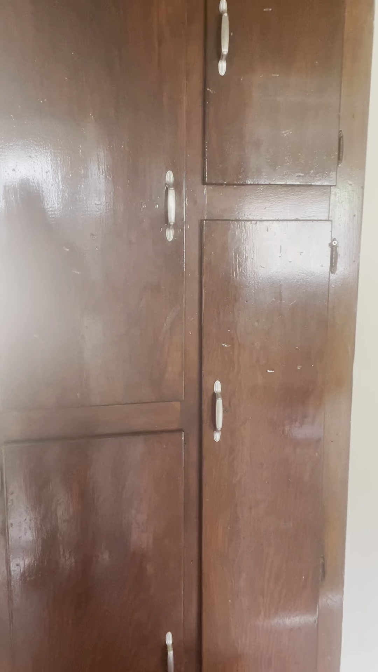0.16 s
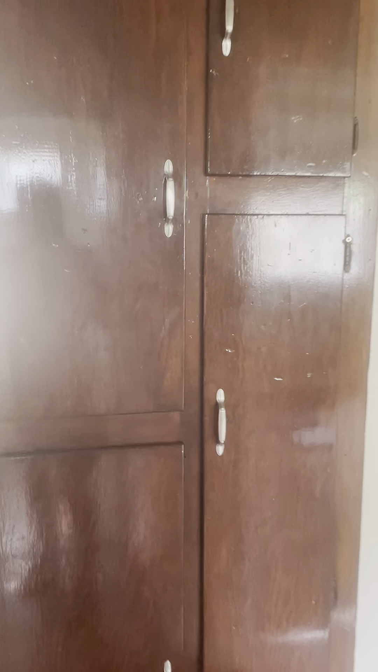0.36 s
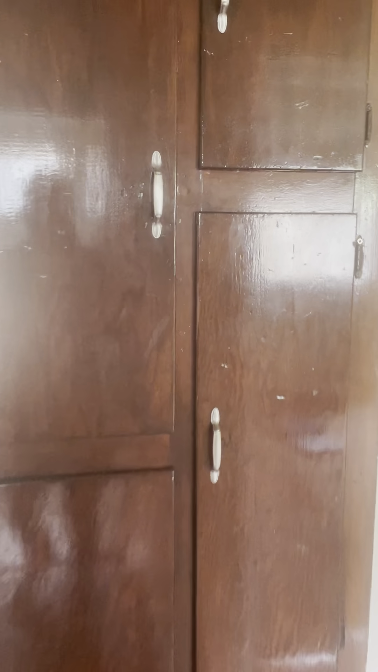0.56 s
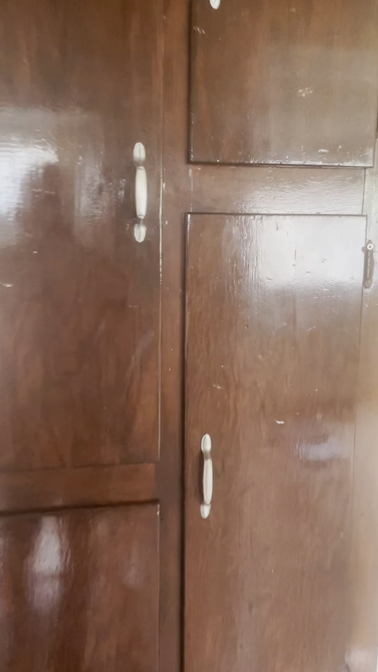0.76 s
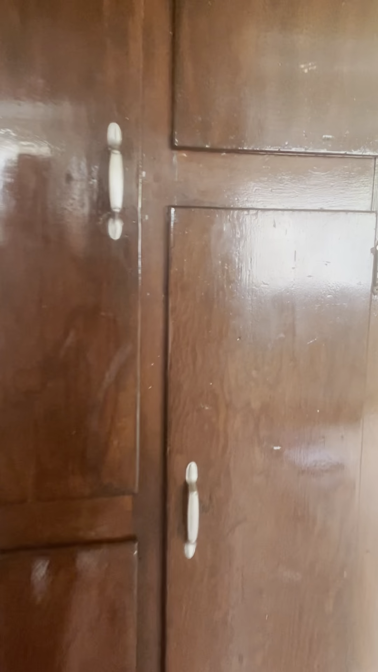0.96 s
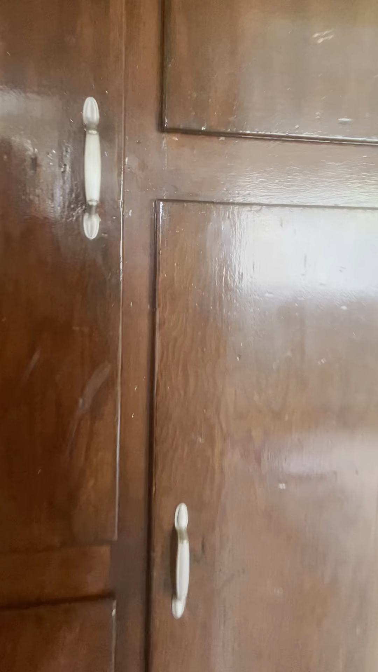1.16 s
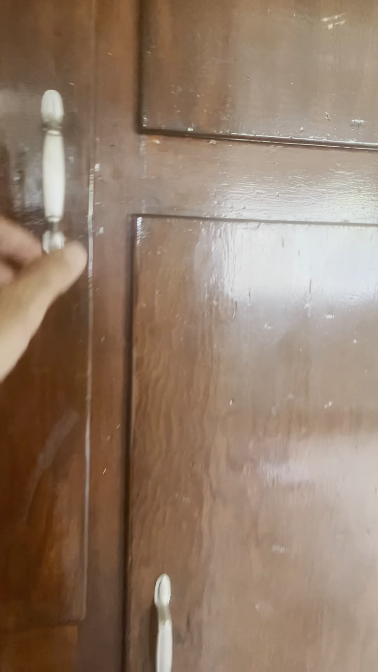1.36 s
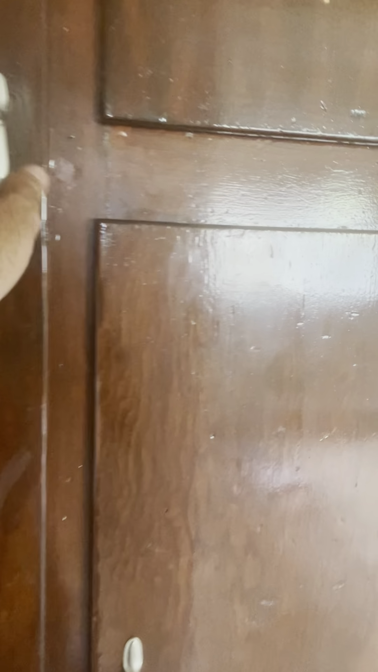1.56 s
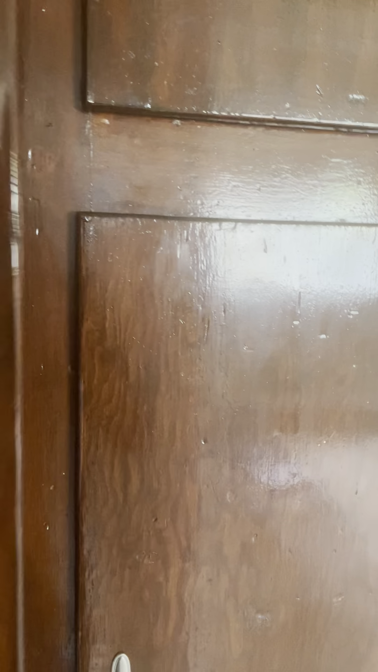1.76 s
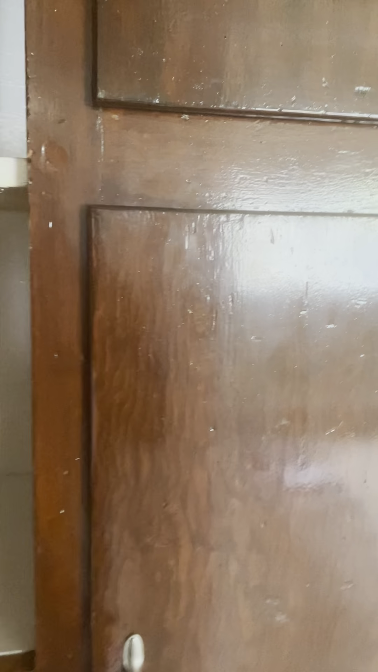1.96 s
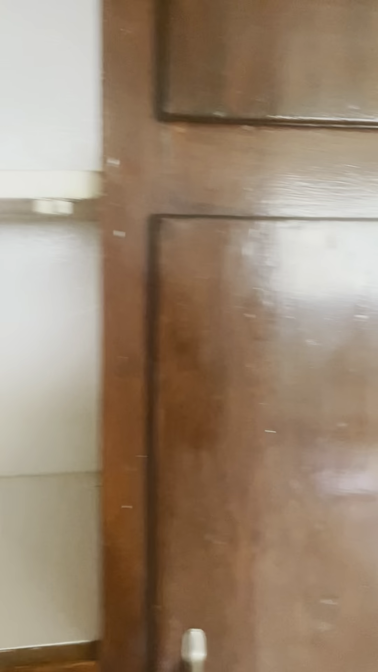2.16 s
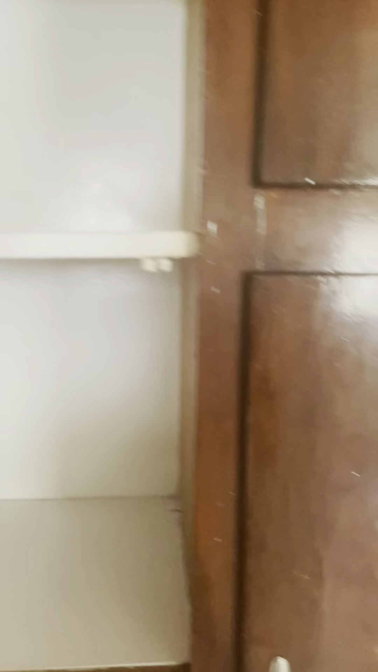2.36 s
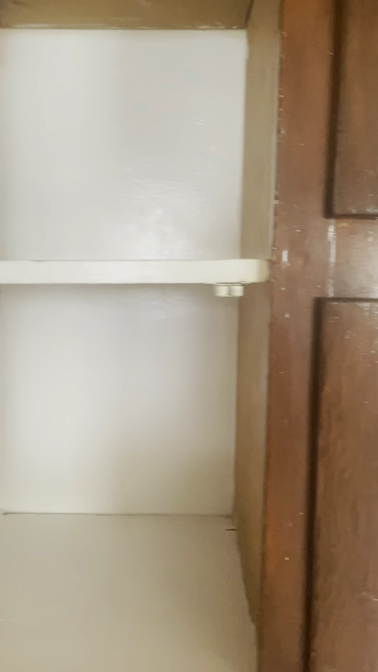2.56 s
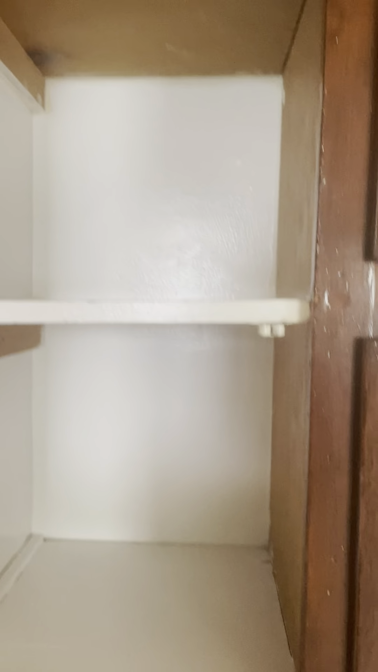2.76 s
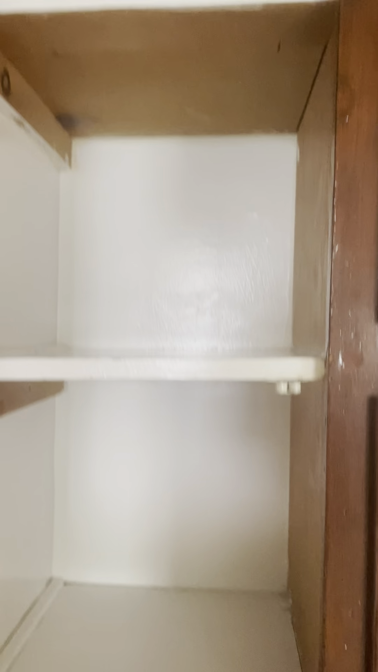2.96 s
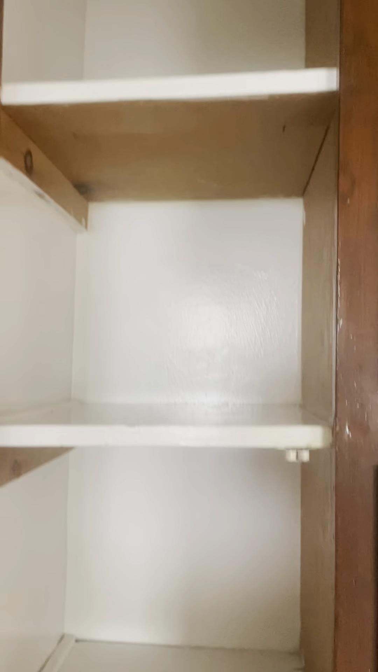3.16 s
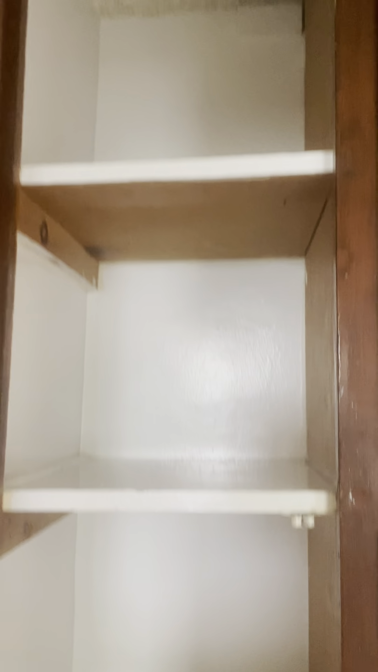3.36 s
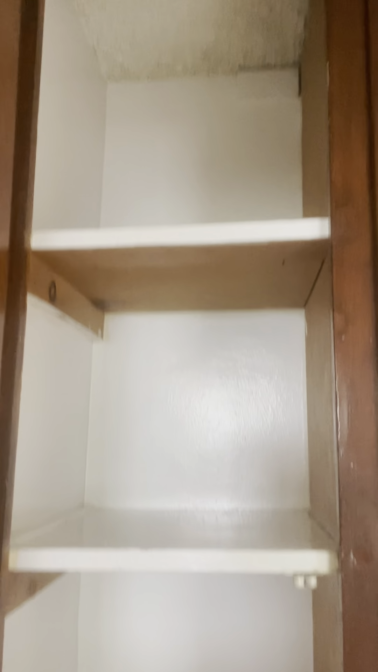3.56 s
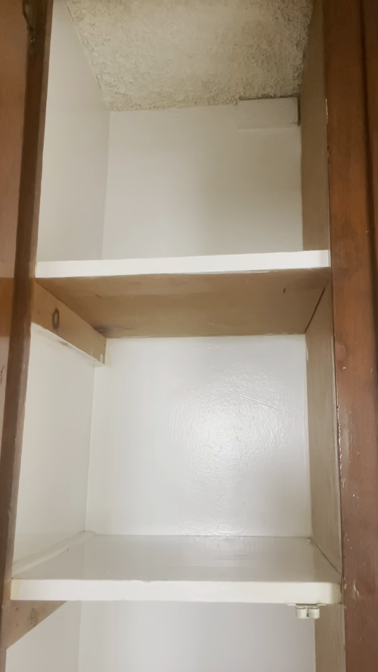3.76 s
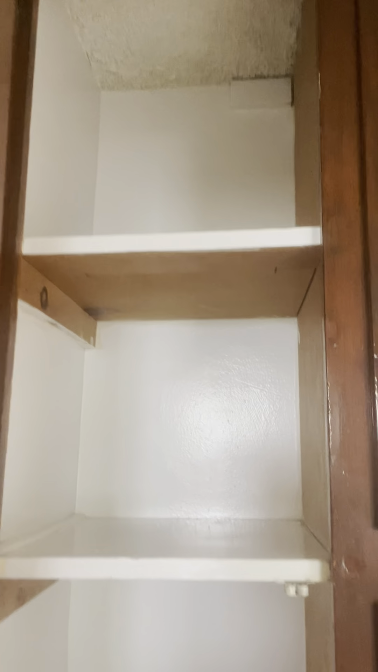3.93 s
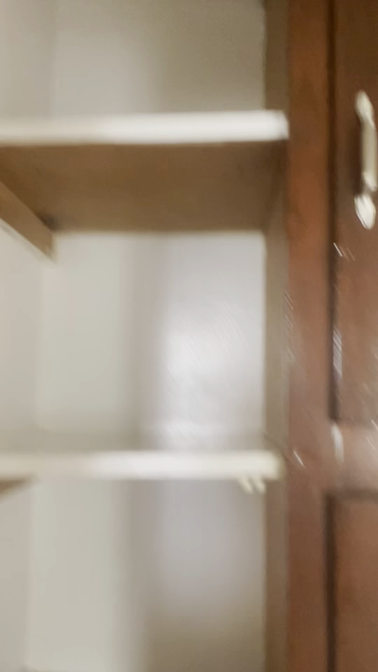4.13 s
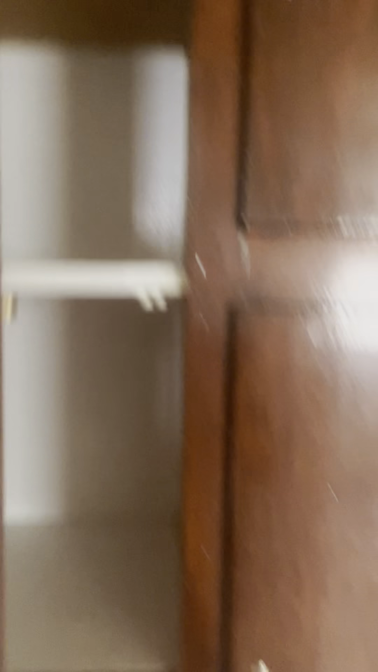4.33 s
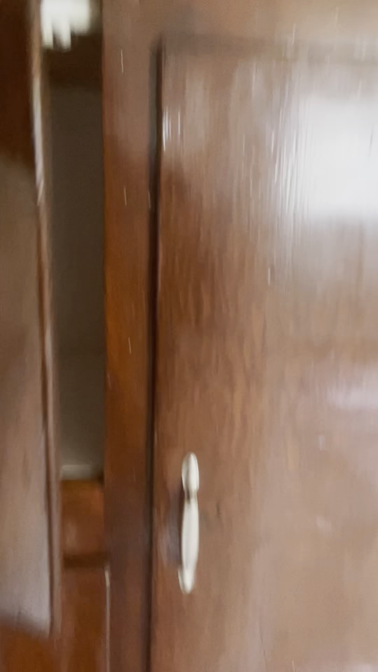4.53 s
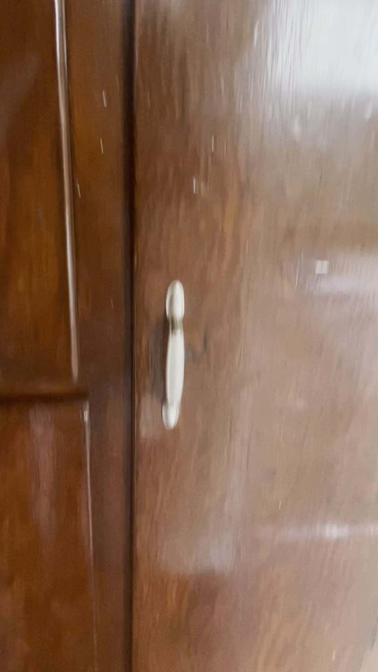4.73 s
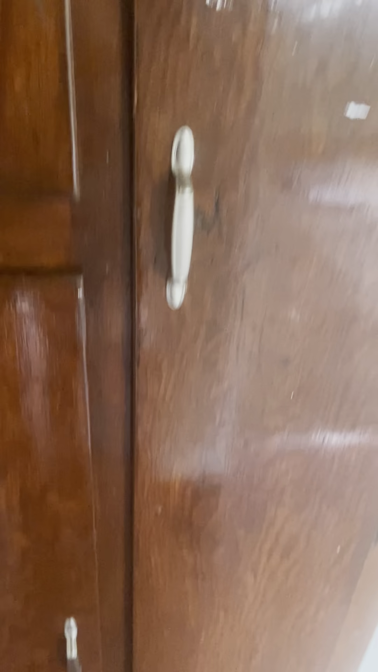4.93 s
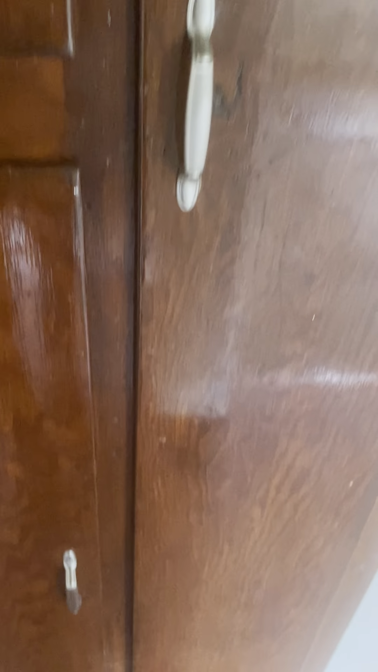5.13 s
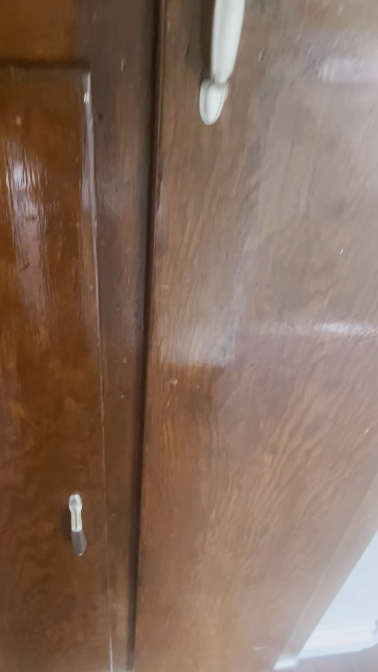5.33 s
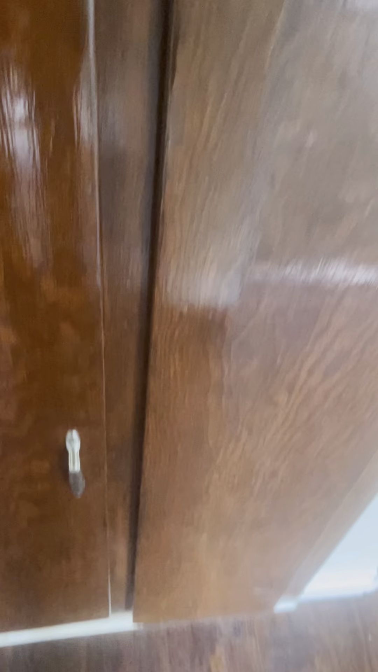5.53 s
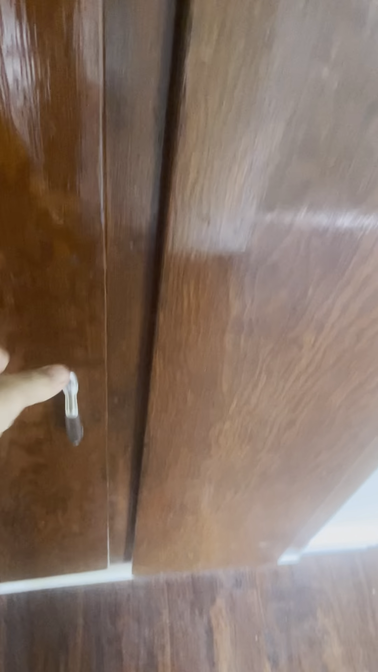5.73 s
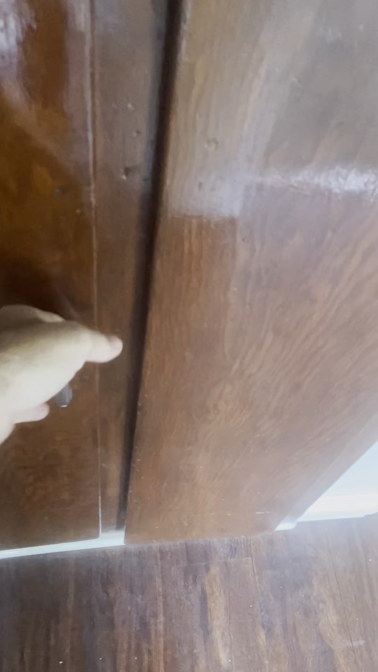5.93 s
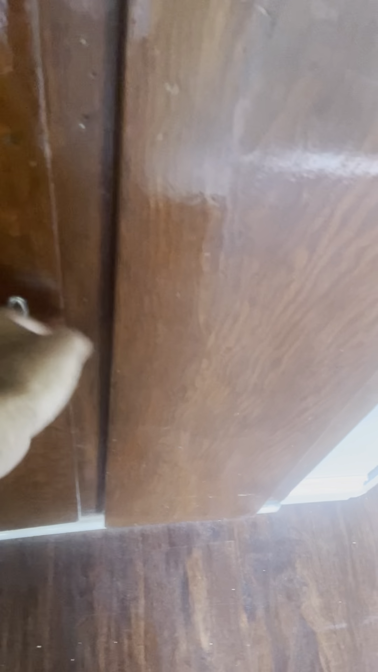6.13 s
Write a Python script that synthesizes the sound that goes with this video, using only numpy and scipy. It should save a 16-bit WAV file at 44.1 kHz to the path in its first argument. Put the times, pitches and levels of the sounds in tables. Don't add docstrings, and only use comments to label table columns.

```python
import sys
import numpy as np
from scipy import signal
from scipy.fft import rfft, irfft, next_fast_len
from scipy.io import wavfile
from scipy.ndimage import uniform_filter1d, map_coordinates

SR = 44100
rng = np.random.default_rng(int(sys.argv[2]) if len(sys.argv) > 2 else 0)


def put_to_file(sound):
    columns = np.atleast_2d(sound).T
    safe = np.clip(columns, -1, 1)
    whole_steps = np.round(safe * 32767)
    wavfile.write(sys.argv[1], SR, whole_steps.astype(np.int16))


def nominal_scale(level):
    x = np.asarray(level, float) / 20
    return 10 ** x


N = 277433


def unit(x):
    return x / np.sqrt(np.mean(x ** 2) + 1e-20)


def along(points, hz):
    f, value = np.transpose(points)
    return np.interp(np.log(hz + 1), np.log(f + 1), value)


def level_curve(rows):
    s, db = np.transpose(rows)
    return np.interp(np.arange(N) / SR, s, db, -120, -120)


def wobble(rate):
    knots = rng.standard_normal(int(N * rate / SR) + 4)
    return map_coordinates(knots, [np.arange(N) * rate / SR])


def filtered(x, response):
    n = x.shape[-1]
    m = next_fast_len(n + 4096)
    return irfft(rfft(x, m) * response(np.fft.rfftfreq(m, 1 / SR)), m)[..., :n]


def rush(spectrum, patchy_db):
    z = signal.stft(rng.standard_normal((2, N + 512)), nperseg=512)[2]
    field = uniform_filter1d(rng.standard_normal(z.shape[1:]), size=5, axis=0)
    field = uniform_filter1d(field, size=12, axis=1)
    pair = signal.istft(z * nominal_scale(patchy_db * unit(field)), nperseg=512)[1][:, :N]
    return unit(filtered(pair, lambda hz: nominal_scale(along(spectrum, hz))))


def held(rows, attack, release):
    t = np.arange(0, N / SR + .002, .002)
    s, length, db = np.transpose(rows)[..., None]
    rising = 20 * np.maximum((s - t) / attack, 0)
    falling = 20 * np.maximum((t - s - length) / release, 0)
    gain = np.sqrt(np.sum(nominal_scale(db - rising - falling) ** 2, axis=0))
    return np.interp(np.arange(N) / SR, t, gain)


def hum(rows, hz, width_hz):
    band = filtered(rng.standard_normal((2, N)), lambda f: 1 / (1 + ((f - hz) / width_hz) ** 2))
    return held(rows, attack=0.039, release=0.1) * unit(band)


def ring(t, hz, t60, attack):
    return np.sin(2 * np.pi * hz * t) * nominal_scale(-60 * t / t60) * (1 - np.exp(-t / attack))


def modes(t, table, damping, factor=1, attack=0.005):
    total = 0
    for hz, db, t60 in table:
        luck, sign = rng.standard_normal(2)
        total = total + np.sign(sign) * nominal_scale(db + 2 * luck) * ring(t, factor * hz, damping * t60, attack)
    return total


# pitch in Hz, level in dB per Hz.
SNAP_COLOUR = [(300, -17), (800, 2.5), (2500, 0.5), (5000, -8.5), (7500, -14), (11000, -28), (12700, -35.5),
               (14500, -25), (15600, -25.5), (16200, -51)]


def snap(t, bright_db, t60, rise=0.00016):
    crackle = rng.standard_normal(len(t)) * nominal_scale(3.7 * rng.standard_normal(len(t)))
    burst = crackle * nominal_scale(-60 * t / t60) * (1 - np.exp(-t / rise))
    x = filtered(burst, lambda f: nominal_scale(along(SNAP_COLOUR, f) + bright_db * np.log2((f + 50) / 3000)))
    return x / np.abs(x).max()


# pitch in Hz, level in dB, time to fall 60 dB in seconds.
PANEL = [(74.4, -14, 0.32), (115, -8.5, 0.21), (155.1, -3.5, 0.17), (206.9, -5.5, 0.11)]


def wood_body(t, thud_db, knock_db, knock_hz, thud_damping, knock_s):
    cluster = [(.7 * knock_hz, -8, .1), (knock_hz, 0, .1), (1.17 * knock_hz, -7, .08), (1.45 * knock_hz, -12, .05)]
    knock = modes(t, cluster, 0.74, attack=0.0011)
    knock = knock * np.exp(-(t / knock_s) ** 4)
    return nominal_scale(thud_db - 5.5) * modes(t, PANEL, thud_damping) + nominal_scale(knock_db - 5) * knock


# pitch in Hz, time to fall 60 dB in seconds.
ROOM = [(60, 0.86), (250, 0.7), (1000, 0.68), (4000, 0.83), (8000, 0.58), (12000, 0.288)]
# pitch in Hz, level in dB.
ECHO = [(100, 6.5), (500, 4), (2000, -3), (6000, -5), (10000, -8), (16000, -9.5)]


def echoes(count):
    hz, t, z = signal.stft(rng.standard_normal((count, 2, SR)), SR, nperseg=256)
    t60 = along(ROOM, hz)[:, None]
    early = .9 * nominal_scale(-60 * t / .15)
    fade = (nominal_scale(-60 * t / t60) + early) * nominal_scale(along(ECHO, hz))[:, None] / np.sqrt(t60 * 3500)
    tails = signal.istft(z * fade, SR, nperseg=256)[1]
    build_up = np.arange(tails.shape[2]) / SR / 0.0063 - .2
    return tails * np.clip(build_up, 0, 1)


def add(air, room, s, sound, dry_db, wet_db):
    tail = room[rng.integers(len(room))]
    heard = nominal_scale(wet_db) * signal.fftconvolve(sound[None], tail, axes=1)
    heard[0, :len(sound)] += nominal_scale(dry_db) * sound
    spot = air[:, round(s * SR):][:, :heard.shape[1]]
    spot += heard[:, :spot.shape[1]]


# pitch in Hz, level in dB per Hz.
HISS = [(550, 3.5), (950, 17), (2000, -2), (5500, -1.5), (7500, -10), (11000, -13.5), (16000, -22)]


def steady_hiss():
    return nominal_scale(-77.0 + 1.6 * wobble(5)) * rush(HISS, patchy_db=-3)


# time in seconds, level in dB.
BUSY = [(0, -59), (.25, -65.5), (.4, -54), (.9, -64.5), (1.07, -55), (1.18, -60), (1.45, -53.5),
        (1.95, -67), (2.03, -50), (2.16, -58.5), (3, -61.5), (3.55, -71), (4.0, -72), (4.3, -65),
        (4.92, -68.5), (5.3, -49), (6.0, -57.5), (6.3, -80)]
CALM_DB = -62.5


def busyness():
    return level_curve(BUSY) - CALM_DB


# pitch in Hz, level in dB per Hz.
RUMBLE = [(12, -59.5), (22, -14.5), (45, -4.5), (59, -1), (77, 0.5), (92, -17), (124, -6.5), (188, -28),
          (250, -24.5), (320, -62), (550, -120)]
# start in seconds, length in seconds, level in dB.
SWAYS = [(.1, 0.18, -43.5), (.38, 0.2, -47.5), (.6, 0.19, -47.5), (.97, 0.02, -46.5), (1.15, 0.091, -49),
         (1.52, 0.086, -41.5), (1.8, 0.15, -47), (2.1, 0.25, -43), (2.55, .16, -59), (2.85, 0.087, -50.5),
         (3.47, 0.015, -50.5), (4.3, 0.14, -60.5), (4.6, 0.076, -64), (4.75, 0.23, -57.5),
         (5.0, 0.35, -44.5), (5.56, 0.044, -51), (6.01, 0.11, -42)]


def house_rumble(busy_db):
    sway = held(SWAYS, attack=0.089, release=0.087)
    gain = np.hypot(sway, nominal_scale(-53.5 + 0.19 * busy_db))
    return gain * nominal_scale(0.6 * wobble(7.0)) * rush(RUMBLE, patchy_db=-0.3)


# pitch in Hz, level in dB per Hz.
MURMUR = [(120, -9.5), (200, 1), (376, -5), (597, -8), (680, -9.5), (752, -8), (1430, -16.5), (1580, -16.5),
          (2200, -39.5), (2860, -74.5), (4840, -120)]


def room_murmur(busy_db):
    return nominal_scale(CALM_DB + busy_db + 0.27 * wobble(10.0)) * rush(MURMUR, patchy_db=2.5)


# start in seconds, length in seconds, level in dB.
BRUSHES = [(.06, 0.087, -80), (.5, 0.29, -79.5), (.97, 0.14, -76), (1.18, .34, -80.5), (2.02, .02, -74.5),
           (3.55, 0.19, -91.5), (4.42, 0.03, -82), (4.62, 0.013, -86), (5.0, .02, -89), (5.53, .03, -80.5),
           (5.8, 0.1, -74), (6.02, 0.15, -78)]
# pitch in Hz, level in dB per Hz.
RUSTLE = [(2200, -35.5), (3500, -7), (5000, 0), (6500, -4), (9000, -10), (12000, -21.5), (13500, -16),
          (15500, -15.5), (16200, -21.5)]
# pitch in Hz, level in dB per Hz.
SHUFFLE = [(900, -42), (1500, -9.5), (2200, -3), (3200, -8), (4500, -10.5), (6000, -28.5)]


def cloth_and_soles(busy_db):
    brush = held(BRUSHES, attack=0.11, release=0.18)
    cloth = np.hypot(brush, nominal_scale(-100)) * nominal_scale(2.5 + 1.9 * wobble(13))
    soles = np.hypot(nominal_scale(9) * brush, nominal_scale(-84.5 + busy_db)) * nominal_scale(0.69 * wobble(17))
    return cloth * rush(RUSTLE, patchy_db=4.0) + soles * rush(SHUFFLE, patchy_db=3.5)


# time in seconds, level in dB.
SCUFF = [
    (1.3, -78),
    (1.43, -56),
    (1.474, -50.5),
    (1.538, -56.5),
    (1.544, -61.5),
    (1.6, -63),
    (1.7, -68),
]
# pitch in Hz, level in dB per Hz.
SCUFF_COLOUR = [(700, -18.5), (2000, 4.5), (4200, 4.5), (6500, -3.5), (10000, -10.5), (13000, -18.5), (16000, -19)]


def scuffing_shoe():
    return nominal_scale(level_curve(SCUFF) + 1.5 + 0.49 * wobble(61.4)) * rush(SCUFF_COLOUR, patchy_db=2.0)


# start in seconds, length in seconds, level in dB.
BOARD = [(0, 0.22, -58), (.326, 0.0083, -45), (.36, 0.12, -53.5), (1.36, 0.068, -48.5), (4.8, 0.043, -65),
         (5.02, 0.02, -56), (5.67, 0.049, -73), (5.79, 0.081, -57)]
# start in seconds, length in seconds, level in dB.
RUBS = [(2.37, 0.25, -64), (4.31, 0.2, -71), (5.68, 0.26, -59.5), (2.76, 0.25, -75.5), (2.39, .08, -66),
        (1.435, .02, -67)]
# pitch in Hz, half width in Hz.
RUB_HZ = [(385, 20), (1150, 110), (800, 90), (1570, 60), (510, 25), (4200, 120)]


def groans():
    total = hum(BOARD, 479.0, 45)
    for row, (hz, width_hz) in zip(RUBS, RUB_HZ):
        total = total + hum([row], hz, width_hz)
    return total


def background():
    busy_db = busyness()
    house = house_rumble(busy_db) + room_murmur(busy_db) + steady_hiss()
    return house + cloth_and_soles(busy_db) + scuffing_shoe() + groans()


# start in seconds, level in dB, top pitch in Hz, end pitch in Hz, length in seconds.
CHIRPS = [
    (1.241, -52, 5545, 3720, 0.066),
    (3.751, -50, 5550, 3350, 0.053),
    (4.533, -50.5, 5750, 3390, .075),
    (5.955, -52, 5664, 3940, 0.062),
]


def sparrow(air, room):
    for s, db, top_hz, end_hz, length in CHIRPS:
        u = np.arange(round(length * SR)) / (length * SR)
        glide = [0.84 * top_hz, .96 * top_hz, top_hz, .97 * top_hz, end_hz]
        hz = np.interp(u, [0, .12, .2, .42, 1], glide)
        swell = nominal_scale(np.interp(u, [0, .2, .45, .8, 1], [-11.5, -7.0, -0.5, -14.5, -31.0]))
        chirp = nominal_scale(db) * swell * np.sin(2 * np.pi * np.cumsum(hz) / SR)
        add(air, room, s, chirp, dry_db=-5, wet_db=11)


# start in seconds, snap in dB, thud in dB, knock in dB, knock pitch in Hz.
STEPS = [(0.0365, -65.5, -41, -69, 520), (0.3184, -56, -35, -32.5, 542), (0.3893, -49, -35.5, -37.5, 345),
         (0.6489, -68, -44, -50, 437), (1.0246, -54.5, -38, -41.5, 545), (1.1611, -55, -67, -33.5, 487),
         (3.884, -56.5, -61, -62, 268), (4.1545, -54.5, -74, -56, 271), (4.7885, -58.5, -58, -76, 483)]


def steps(air, room):
    t = np.arange(SR // 4) / SR
    for s, snap_db, thud_db, knock_db, knock_hz in STEPS:
        body = wood_body(t, thud_db, knock_db, knock_hz, thud_damping=.6, knock_s=.014)
        add(air, room, s, body, dry_db=7, wet_db=-1)
        sole = nominal_scale(snap_db + 3.0) * snap(t, -1, 0.075, rise=0.00079)
        add(air, room, s, sole, dry_db=1, wet_db=5.5)


# start in seconds, level in dB, brightness in dB per octave, echo in dB.
TICKS = [(0.82, -51.5, 1, 7.5), (1.7382, -23, 1.5, -13), (1.715, -30, 3, -8), (2.173, -49.5, 3.5, 4),
         (2.299, -54.5, 5, 4.5), (2.4102, -52, 1.5, 5.5), (2.4392, -52.5, 7, -6), (1.5415, -36, -2, 5),
         (2.727, -55, 4.5, 4), (2.821, -53, 5, 2.5), (3.075, -51, 4, 3), (3.265, -63.5, 11.5, 8),
         (3.2906, -55, -5, 3.5), (3.379, -53, 6, 6), (1.556, -39, -1, 5), (4.0295, -60, -2, 2),
         (4.2269, -55, -0.5, 4.5), (4.8386, -55.5, -3.5, 1), (4.9403, -56.5, -4.5, 8),
         (4.985, -59.5, 2.5, 11.5), (5.013, -41, -2.5, 7), (5.0342, -50.5, 0.5, 20),
         (5.131, -25.5, 2.5, -20), (5.1418, -19, -2, -0.5), (5.1716, -23.5, 2, -11),
         (5.5336, -47.5, 1, 4.5), (6.19, -45.5, 6.5, 3.5), (6.2844, -49, 3, 0)]


def ticks(air, room):
    t = np.arange(SR // 10) / SR
    for s, db, bright_db, wet_db in TICKS:
        tick = nominal_scale(db + 1.5) * snap(t, bright_db, 0.034, rise=0.0017)
        add(air, room, s, tick, dry_db=-2.0, wet_db=wet_db)


# start in seconds, level in dB, brightness in dB per octave.
CLICKS = [(.3895, -52, -2), (1.6906, -45.5, 4.5), (1.7113, -34.5, 4.5), (1.7164, -28.5, 1.5),
          (1.72, -29.5, 2), (1.728, -34.5, 3.5), (1.733, -26.5, 1.5), (1.738, -16.5, 3), (1.7505, -36, 5),
          (2.727, -63.5, 2), (3.074, -58, 6), (3.292, -59, 0), (4.032, -60, 9), (4.156, -54, 0),
          (4.788, -57, -4), (5.012, -48, -1.5), (5.0885, -20, -4), (5.0992, -23, 2), (5.1105, -29, 4.5),
          (5.132, -21.5, 8), (5.14, -30, 4.5), (5.173, -22.5, 5.5), (5.952, -47, -2), (5.981, -53, -2),
          (6.1056, -34.5, 1), (6.1904, -45, 4), (6.229, -54, 3), (.82, -53, 0), (1.1605, -43, -4),
          (1.0255, -50, -4), (.3195, -47, -5)]


def clicks(air, room):
    t = np.arange(SR // 20) / SR
    for s, db, bright_db in CLICKS:
        add(air, room, s, nominal_scale(db) * snap(t, bright_db, .007, rise=.0003), dry_db=2, wet_db=-7)


# start in seconds, level in dB, pitch in Hz, time to fall 60 dB in seconds.
KNOCKS = [(.039, -50.5, 500, .08), (.317, -53, 2100, .05), (3.292, -63, 1250, .05), (3.38, -60, 520, 0.052),
          (3.08, -57, 560, .08), (4.157, -58, 480, 0.053), (4.79, -61, 1000, .06), (5.013, -52, 1400, .05),
          (5.07, -26, 185, 0.11), (5.092, -19, 150, 0.1), (5.089, -20, 317, .13), (6.107, -39, 5600, 0.022),
          (1.0255, -44, 600, 0.06), (1.1605, -41, 650, 0.03), (1.1755, -40, 608, .07),
          (1.162, -41, 801, 0.038), (1.523, -36, 170, 0.05), (1.543, -32, 246, .08), (1.553, -35, 745, .06),
          (5.0577, -14.5, 145, 0.063), (5.063, -39, 460, 0.13), (5.07, -39.5, 900, 0.091),
          (5.105, -29, 815, .13), (5.092, -24.5, 925, .12), (5.135, -23, 255, 0.13), (5.15, -26, 453, 0.5),
          (5.2, -27.5, 205, 0.16), (5.17, -28, 102, 0.12), (5.956, -54, 1300, .05), (5.99, -43, 333, 0.3),
          (5.988, -46, 516, 0.4), (5.992, -52, 1165, 0.15), (5.953, -47, 1680, 0.04),
          (5.99, -54, 2800, 0.045), (6.111, -44.5, 1367, .28), (6.195, -46.5, 1200, 0.081),
          (1.739, -23.5, 165, 0.15), (1.74, -31, 265, .2), (1.742, -32, 925, 0.12), (1.739, -28, 489, .17),
          (5.15, -33, 620, .1), (1.027, -46, 340, 0.11), (1.163, -41.5, 350, 0.091), (6.107, -39, 337, .15)]
# start in seconds, level in dB, pitch in Hz,
# time to fall 60 dB in seconds.
MORE_KNOCKS = [(5.99, -45, 280, .17), (6.107, -41, 288, .08), (6.11, -43, 1180, .21), (5.99, -39, 166, .25),
               (5.953, -47, 1020, .04), (6.146, -33, 92, .09), (5.094, -24, 180, .1), (5.1, -27, 520, .08),
               (6.106, -38, 800, .04), (2.22, -40, 58, .5), (5.954, -51, 1350, .04), (1.775, -33, 450, .12),
               (2.72, -46, 70, .08)]


def wood_tones(air, room):
    t = np.arange(SR // 3) / SR
    for s, db, hz, t60 in [*KNOCKS, *MORE_KNOCKS]:
        add(air, room, s, nominal_scale(db) * ring(t, hz, t60, 0.0022), dry_db=1.5, wet_db=-7.5)


# start in seconds, level in dB, pitch in Hz, time to fall 60 dB in seconds.
METAL = [(.39, -46, 2270, 0.022), (2.035, -51, 1470, 0.072), (3.077, -65.5, 2866, 0.036),
         (5.014, -50.5, 2220, 0.056), (5.101, -39.5, 2358, 0.17), (5.987, -43, 2700, 0.04),
         (6.106, -36.5, 3165, 0.022), (6.113, -49, 1280, 0.08), (6.117, -50.5, 1408, 0.089),
         (6.107, -40, 4530, 0.018)]


def metal(air, room):
    t = np.arange(SR // 3) / SR
    for s, db, hz, t60 in METAL:
        pair = ring(t, hz, t60, 0.00075) + 0.7 * ring(t, 0.91 * hz, t60, 0.0014)
        add(air, room, s, nominal_scale(db) * pair, dry_db=9.0, wet_db=2.0)


# start in seconds, level in dB, pitch in Hz, time to fall 60 dB in seconds.
BOOMS = [(1.545, -24, 82, 0.7), (1.742, -25.5, 84, 0.24), (1.78, -35, 42, 0.54), (5.094, -14.5, 82, 0.6),
         (5.15, -26.5, 42, .5), (5.057, -14.5, 105.4, 0.2), (1.555, -28, 165, 0.3), (1.75, -39, 480, .15),
         (5.09, -31, 383, 0.3), (5.088, -18.5, 207, 0.35), (5.13, -29, 253, 0.39), (5.075, -24, 168, 0.21),
         (5.15, -24.5, 150, 0.24), (1.025, -42, 290, .12), (1.161, -39.5, 260, 0.096),
         (1.4, -47.5, 140, .15)]


def cabinet_booms(air, room):
    t = np.arange(SR // 2) / SR
    for s, db, hz, t60 in BOOMS:
        add(air, room, s, nominal_scale(db) * ring(t, hz, t60, .008), dry_db=0, wet_db=-9)


# start in seconds, thud in dB, pitch factor.
PUSHES = [
    (1.522, -38, 1.22),
    (1.559, -37, 0.94),
    (5.056, -29, 1.1),
    (5.164, -19, 0.94),
    (5.22, -34.5, 1.13),
    (6.021, -37.5, 0.95),
    (6.14, -31.5, 0.96),
]


def pushes(air, room):
    t = np.arange(SR // 3) / SR
    for s, db, factor in PUSHES:
        add(air, room, s, nominal_scale(db) * modes(t, PANEL, 0.54, factor), dry_db=-0.5, wet_db=-10.0)


# start in seconds, snap in dB, thud in dB, knock in dB, knock pitch in Hz.
DOOR = [(1.5426, -46, -35, -33, 620), (1.5556, -48, -35, -32.5, 348), (1.6935, -45, -44, -77, 365.5),
        (1.7104, -45, -52, -53, 274.4), (1.715, -27, -58.5, -28.5, 1095), (1.7228, -30, -46, -31.5, 1114),
        (1.7382, -20.5, -23, -24, 489), (1.7485, -28, -24, -47, 465), (1.7603, -34.5, -27, -47.5, 460),
        (2.032, -36, -60, -36.5, 645), (5.0886, -27, -17, -14.5, 310), (5.099, -18.5, -15, -13, 271),
        (5.1114, -23.5, -36, -16.5, 280), (5.1239, -28, -19, -28, 280), (5.9516, -49, -85, -41, 1150),
        (5.9709, -48, -42, -44, 524), (5.9899, -45, -39, -41, 333), (6.106, -40, -34, -40, 326)]
# pitch in Hz, level in dB, time to fall 60 dB in seconds.
GRAIN = [(250, -8, .12), (297, -3.5, 0.072), (310, -11, 0.42), (470.4, -3.5, 0.1), (632, -14, 0.29),
         (696, -9, 0.098), (827, -12.5, 0.13), (914, -6, 0.16), (1051, -14.5, 0.15)]


def doors(air, room):
    t = np.arange(SR // 3) / SR
    for s, snap_db, thud_db, knock_db, knock_hz in DOOR:
        body = wood_body(t, thud_db, knock_db, knock_hz, thud_damping=0.77, knock_s=0.012)
        bright_db = 0.7 + 0.17 * (snap_db - thud_db)
        splinter = nominal_scale(snap_db + 4.0) * snap(t, bright_db, 0.044)
        grain = nominal_scale(knock_db - 10.0) * modes(t, GRAIN, 0.69, attack=0.0018)
        add(air, room, s, body + splinter + grain, dry_db=1.7, wet_db=-0.5)


def scene():
    air, room = background(), echoes(count=12)
    for source in (sparrow, steps, ticks, clicks, wood_tones, metal, cabinet_booms, pushes, doors):
        source(air, room)
    return air


# pitch in Hz, likeness from 0 to 1.
ALIKE = [(100, .9997), (250, .99), (500, .93), (1000, .35), (3000, .3), (4500, .2), (6500, .7), (7600, .96),
         (9400, .82), (11000, .98), (12600, .65), (14300, .93), (15800, .6)]
# pitch in Hz, lead in radians.
LEAD = [(0, 0), (1000, .27), (3300, 1.3), (5200, .1), (6500, 2), (7200, 3.05), (7900, 3.25), (9300, 4.6),
        (10600, 6.15), (11500, 6.3), (12700, 8.2), (14000, 9.38), (14800, 9.55), (16000, 10.8)]
# pitch in Hz, level in dB.
LOUDER = [(100, 0), (350, .5), (700, 1.1), (1400, .05), (4000, .4), (9000, -.25), (13000, 0)]


def microphone(dry):
    def shares(hz):
        turn = np.arccos(np.clip(along(ALIKE, hz), 0, 1)) / 2
        return np.array([np.cos(turn), np.sin(turn)])

    def port_response(hz):
        side = np.array([[1], [-1]])
        return np.exp(.5j * np.interp(hz, *np.transpose(LEAD)) * side) * nominal_scale(along(LOUDER, hz) * side)

    same, other = filtered(dry, shares)
    ports = filtered(np.array([same + other, same - other]), port_response)
    low_cut = signal.butter(4, 35, "high", fs=SR, output="sos")
    ports = signal.sosfilt(low_cut, ports)
    return ports / (1 + np.abs(ports / .56) ** 4) ** (1 / 4)


def low_pass(x):
    return signal.sosfilt(signal.butter(12, 15950, fs=SR, output="sos"), x)


def record(dry):
    ports = microphone(dry)
    return low_pass(ports)


dry = scene()
out = record(dry)
put_to_file(out)
```